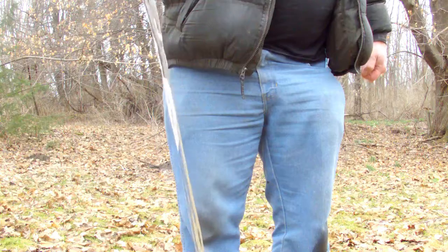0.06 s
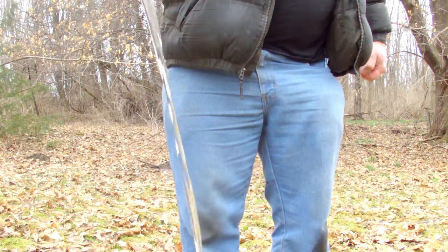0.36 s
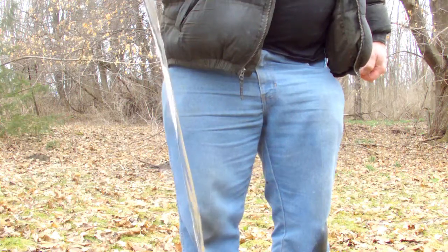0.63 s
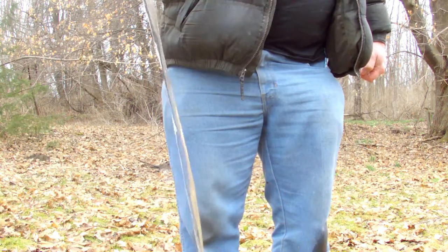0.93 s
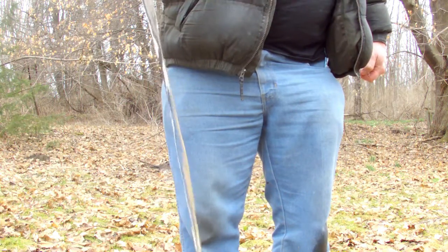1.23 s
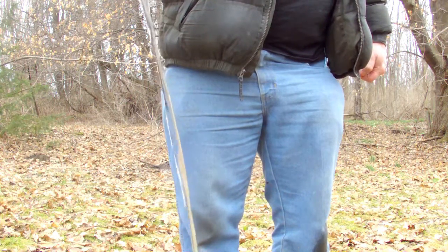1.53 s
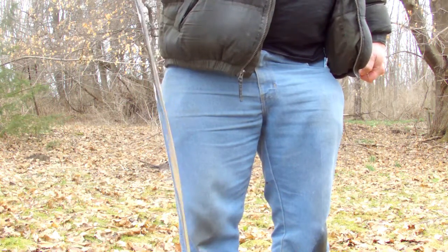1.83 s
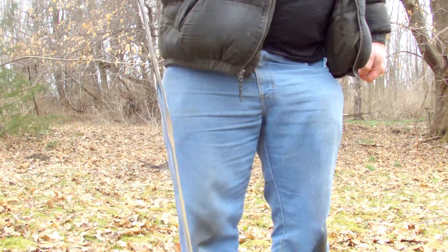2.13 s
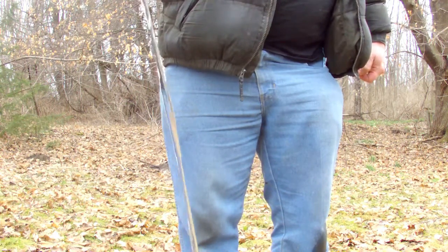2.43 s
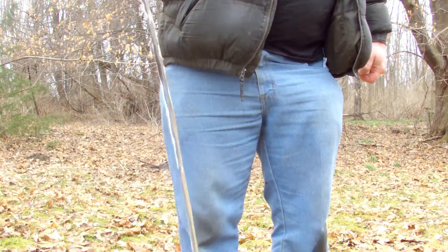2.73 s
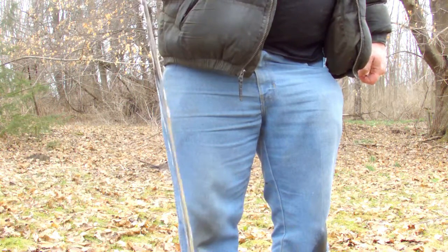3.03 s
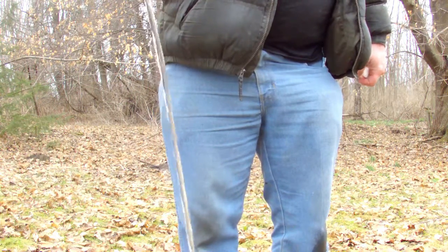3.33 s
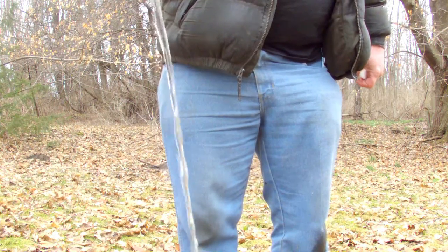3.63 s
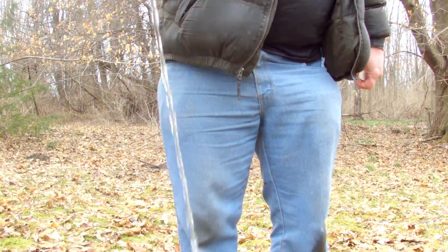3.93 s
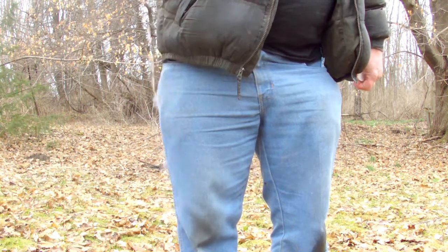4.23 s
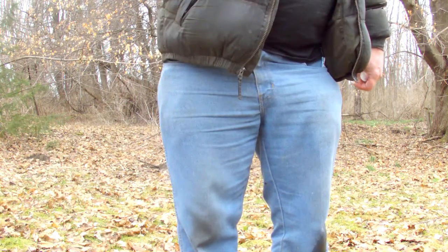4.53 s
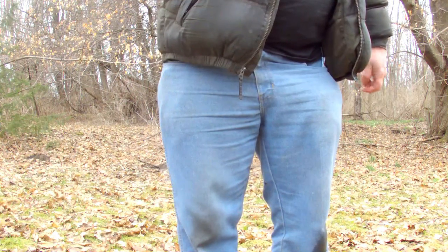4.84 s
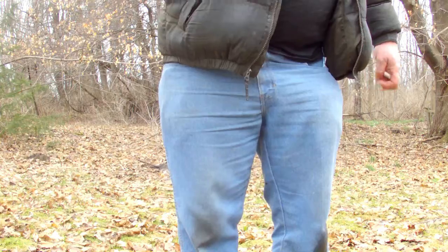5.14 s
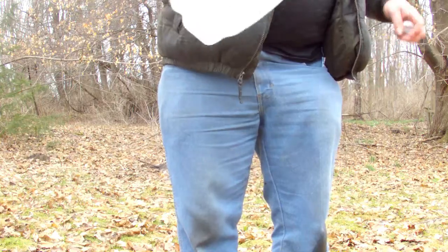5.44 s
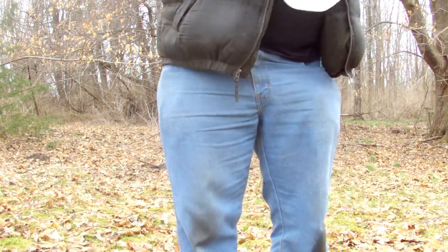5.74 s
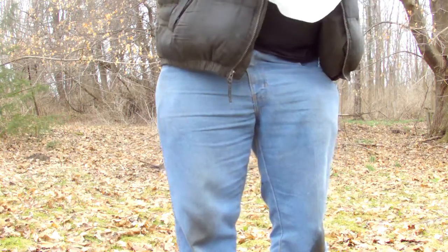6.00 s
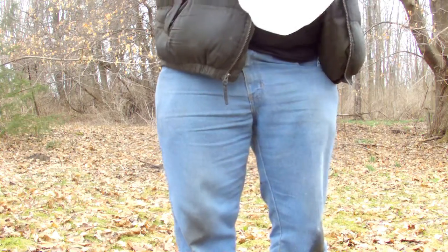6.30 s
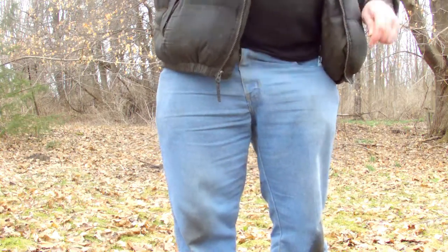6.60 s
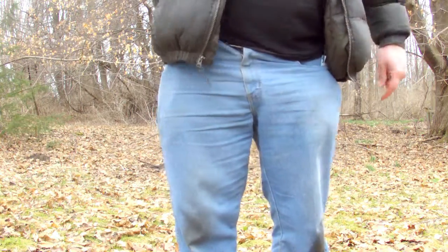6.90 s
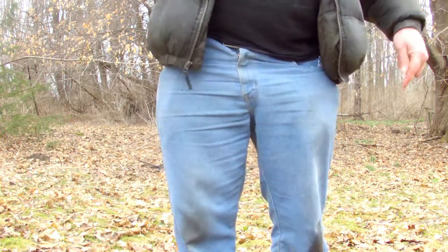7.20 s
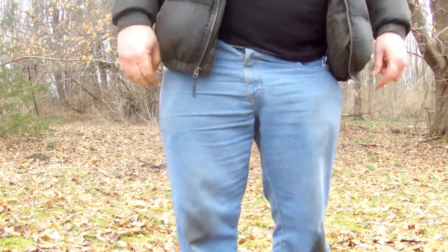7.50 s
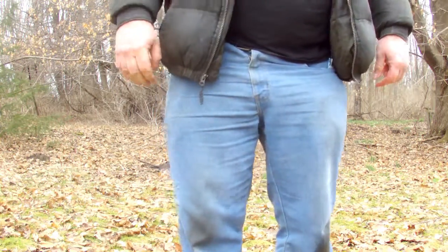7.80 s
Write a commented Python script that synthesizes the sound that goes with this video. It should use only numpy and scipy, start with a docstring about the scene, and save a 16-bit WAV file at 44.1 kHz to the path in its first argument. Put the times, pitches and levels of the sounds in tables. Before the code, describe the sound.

In a still wood, water pours steadily onto fallen leaves near the microphone, wet slaps mixed with crisp ticking spray. After it trickles out, hollow plastic pops and crackles come from the emptied jug, then a sharp knock and a softer landing on the leafy ground. Light jacket rustling runs under the handling and continues to the end, over a faint hiss of air.

```python
"""Water poured on dry leaves

A thin stream falls from a plastic jug in a quiet wood, beading into drops that slap the leaf bed
about 90 times a second, a few of them heavy; it dies away and soaks in. The empty jug pops as it
is handled, is knocked away and lands in the leaves; a jacket rustles."""
import sys
import numpy as np
from scipy import signal
from scipy.fft import rfft, irfft
from scipy.io import wavfile
from scipy.ndimage import uniform_filter1d

SR = 44100
rng = np.random.default_rng(int(sys.argv[2]) if len(sys.argv) > 2 else 0)


def output_pcm(signal):
    """Save a mono or channel-first signal as 16-bit PCM at the path in sys.argv[1].

    Samples are clipped to [-1, 1] before scaling.
    """
    pcm = np.clip(np.atleast_2d(signal).T, -1, 1) * 32767
    wavfile.write(sys.argv[1], SR, np.round(pcm).astype(np.int16))


N = 346626
HZ = np.fft.rfftfreq(N, 1 / SR)
TIME = np.arange(N) / SR


def amp(db):
    """Decibels to gain."""
    return 10 ** (np.asarray(db) / 20)


def unit(x):
    """Scales to rms 1."""
    return x / np.sqrt(np.mean(x ** 2) + 1e-20)


def read(points, hz):
    """Reads a curve on a log-frequency axis."""
    f, value = np.transpose(points)
    return np.interp(np.log(hz + 1), np.log(f + 1), value)


def add(mix, s, sound):
    """Mixes a sound in at time s."""
    part = mix[max(round(s * SR), 0):][:len(sound)]
    part += sound[:len(part)]


def colour(x, points, size=2048):
    """Causal EQ of unit energy: the curve sets tone, not loudness."""
    log_gain = np.log(amp(read(points, abs(np.fft.fftfreq(size, 1 / SR)))))
    taps = np.fft.ifft(np.exp(np.conj(signal.hilbert(log_gain)))).real[:size // 2]
    return signal.oaconvolve(x, taps / np.linalg.norm(taps))[:N]


def grains(per_s, spread_db):
    """Random clicks of unequal size, rms 1."""
    size = amp(spread_db * np.minimum(rng.exponential(1, N), 4))
    return unit(size * rng.choice([-1, 1], N) * (rng.random(N) < per_s / SR))


def clumps(depth_db, length_s=0.014):
    """A gain of rms 1 that swells and sinks rapidly at random."""
    blur = np.exp(-(HZ * length_s) ** 2)
    wander = unit(irfft(rfft(rng.standard_normal(N)) * blur, N))
    return unit(amp(depth_db * wander))


# Tone of the ambience: (frequency [Hz], gain [dB])
AIR_EQ = [(20, 4.5), (40, -8), (80, -9.5), (160, -17), (330, -16), (600, -10.5), (900, -6.5), (1200, -12.5),
          (2000, -20), (3500, -12.5), (6500, -35.5), (8500, -18.5), (12000, -20.5), (15800, -17)]
# Its stereo image: (frequency [Hz], left-right correlation [0..1])
AIR_CORRELATION = [(30, 0.34), (120, 0.065), (300, 0.98), (4000, 1), (9000, 0.88), (15000, 0.72)]
# Thin, steady whine: (frequency [Hz], level [dB])
WHINE_TONES = [(11864.5, -70), (15524, -82), (15584, -83), (15644, -81), (15704, -79)]
def air(db=-59.0):
    """Still woodland air with a camera's hiss, rumble and whine."""
    mid, side = rfft(rng.standard_normal((2, N))) * amp(read(AIR_EQ, HZ))
    same = np.clip(read(AIR_CORRELATION, HZ), -1, 1)
    hiss = irfft(mid * np.sqrt(1 + same) + np.array([[1], [-1]]) * side * np.sqrt(1 - same), N)
    whine = sum(amp(level) * np.sqrt(2) * np.sin(2 * np.pi * (hz * TIME + rng.random()))
                for hz, level in WHINE_TONES)
    return amp(db) * unit(hiss) + whine


def trunks(x, db=-27, t60=0.23, build_s=0.061):
    """The trunks scatter a faint, dull reverb tail."""
    t = np.arange(SR) / SR
    tail = rng.standard_normal(SR) * amp(-60 * t / t60) * np.minimum(t / build_s, 1)
    tail = signal.lfilter(*signal.butter(1, [400, 4000], "band", fs=SR), tail)
    return amp(db) * signal.fftconvolve(x, tail / np.linalg.norm(tail))[:N]


# Fader ride, soaking leaves into jacket: (time [s], rubbing [dB], swish [dB])
RUSTLE_RIDE = [(4.5, -58.5, -56), (5.02, -58.5, -58), (5.24, -60, -61.5), (5.51, -60, -61.5),
               (6.08, -55, -57), (6.29, -52.5, -55.5), (6.42, -56.5, -53), (6.49, -59.5, -61.5),
               (7.13, -55, -54), (7.3, -55, -52.5), (7.6, -55, -53), (7.86, -59.5, -53)]
# Sleeves brushing the jacket: (time [s], length [s], rubbing [dB], swish [dB])
SLEEVE_STROKES = [(7.664, 0.014, -59, -49), (7.684, .07, -66, -49.5)]
# Cloth on cloth, midrange rub and airy swish: (frequency [Hz], gain [dB])
RUBBING_EQ = [(200, -38), (500, -15), (1100, 1.5), (1600, 0.5), (2150, 2.5), (2900, -5), (3600, -5),
              (5000, -20), (12000, -23)]
SWISH_EQ = [(2000, -18), (4200, -4.5), (5200, -1.5), (6000, -0.5), (6550, 1.5), (7100, -4), (7800, -11.5),
            (11000, -20), (16000, -35)]
def rustle(rubbing_db=-2, swish_db=-3.0, floor_db=-66):
    """Fine, dense ticks fade in as the pour ends: leaves fizz as they soak, then the jacket rubs."""
    at, *levels = np.transpose(RUSTLE_RIDE)
    above_floor = np.sqrt(np.maximum(amp(levels) ** 2 - amp(floor_db) ** 2, 1e-9))
    rubbing, swish = (np.interp(TIME, at, gain) for gain in above_floor)
    for s, length, rub_db, brush_db in SLEEVE_STROKES:
        stroke = signal.windows.tukey(round(length * SR), .5)
        add(rubbing, s, amp(rub_db) * stroke)
        add(swish, s, amp(brush_db) * stroke)
    x = amp(rubbing_db) * rubbing * colour(grains(per_s=9000, spread_db=2.5), RUBBING_EQ)
    x += amp(swish_db) * swish * colour(grains(per_s=6400, spread_db=2.5), SWISH_EQ)
    return x * np.interp(TIME, [4.2, 4.5], [0, 1])


# The jug hitting the ground: (time [s], level [dB], decay [s])
THUD_CUES = [(6.698, -69, 0.028), (7.152, -53.5, 0.053)]
# Low end of soft soil: (frequency [Hz], gain [dB])
SOIL_EQ = [(60, -25), (120, -16), (175, -4), (250, 0), (400, -6), (1200, -40)]
def thuds(attack_s=.003):
    """The soil under the leaves takes the jug with a short, dull thump."""
    t, envelope = np.arange(SR // 2) / SR, np.zeros(N)
    for s, db, decay in THUD_CUES:
        add(envelope, s, amp(db) * np.exp(-t / decay) * (1 - np.exp(-t / attack_s)))
    return colour(envelope * rng.standard_normal(N), SOIL_EQ)


# Hits on the jug: (time [s], body [dB], body centre [Hz], crunch [dB], contact length [s])
JUG_HITS = [(5.073, -48.5, 280, -62, .003), (5.081, -52, 700, -64, .012), (5.153, -48, 1300, -66, .05),
            (5.811, -25.5, 1620, -30, 0.00079), (5.816, -32, 1540, -37, 0.0076),
            (5.849, -36, 1690, -54, 0.17), (5.9222, -23.5, 1770, -32, 0.0046),
            (5.9299, -25, 1750, -30, 0.0036), (5.9452, -28, 1800, -33, 0.0035),
            (6.1114, -34.5, 1350, -37.5, 0.0062), (6.137, -47, 1300, -43.5, 0.007),
            (6.177, -45.5, 636, -54, .004), (6.206, -47, 443, -58, 0.0062), (6.672, -31, 1330, -34, 0.022),
            (6.691, -22, 1390, -23.5, 0.0044), (6.695, -22, 1060, -24, 0.0041),
            (6.708, -27, 1090, -42, 0.0051), (6.745, -42.5, 596, -35, 0.005), (7.143, -44, 800, -30, 0.008),
            (7.152, -30, 790, -27.5, 0.01), (7.174, -39, 420, -44, 0.031),
            (7.439, -45, 1010, -43.5, 0.0082)]
# Ring of the hollow plastic: (frequency [Hz], gain [dB], full t60 [s])
JUG_MODES = [(357.6, -9.5, 0.24), (504, -9, 0.12), (746, -7.5, 0.086), (860, -9, 0.11), (995, -4.5, 0.11),
             (1135, -5, 0.17), (1218, -3.5, 0.15), (1390, -29, 0.035), (1683, 4, 0.088), (1945, 4, 0.042),
             (2430, -1, .07)]
# Wash of dense wall modes: (frequency [Hz], full t60 [s])
WALL_DECAY = [(200, 0.1), (400, 0.22), (800, 0.2), (1500, 0.14), (3000, 0.085), (8000, 0.065)]
# Crisp edge of plastic and leaves: (frequency [Hz], gain [dB])
CRUNCH_EQ = [(150, -24), (350, -20), (1200, -56), (2500, -3.5), (4000, 4.5), (6200, 6), (7600, 1),
             (9000, -9.5), (12000, -18.5), (16000, -27)]
def jug(modes_db=-2, wall_db=-4, octaves=0.8, scatter_db=-21, scatter_s=0.038, size=22050):
    """Each blow is a short crumple that rings the hollow jug and crunches plastic or leaves."""
    t, body, crunch = np.arange(size) / SR, np.zeros(N), np.zeros(N)
    mode_hz, mode_db, t60 = np.transpose(JUG_MODES)[:, :, None]
    onset = t < .006  # the transient sets a hit's level
    for s, body_db, centre_hz, crunch_db, contact in JUG_HITS:
        def reach(hz):
            """A blow stirs the modes near its centre, low ones if it is soft."""
            return 1 / (1 + (np.log2((hz + 1) / centre_hz) / octaves) ** 2) ** 0.96
        # Share of the full ring time: a grip chokes sharp pops and detunes the walls.
        ring = min(0.728 * (contact / 0.0082) ** 0.29, 1)
        phase, dent = rng.random((2, len(JUG_MODES), 1))
        bent_hz = mode_hz * (1 + 0.51 * max(.9 - ring, 0) * (dent - .5))
        envelopes = amp(mode_db - 60 * t / (t60 * ring)) * reach(mode_hz)
        modes = (envelopes * np.sin(2 * np.pi * (bent_hz * t + phase))).sum(0)
        hz, at, bands = signal.stft(rng.standard_normal(size), SR, nperseg=256)
        wall_t60 = contact * 2 + ring * read(WALL_DECAY, hz)[:, None]
        bands *= reach(hz)[:, None] * amp(-60 * at / wall_t60)
        wall = signal.istft(bands, SR, nperseg=256)[1][:size]
        shell = amp(modes_db) * modes / modes[onset].std() + amp(wall_db) * wall / wall[onset].std()
        attack = 1 - np.exp(-t / (0.26 * contact))
        add(body, s, amp(body_db) * shell * attack)
        crumple = rng.standard_normal(size) * unit(np.exp(.5 * rng.standard_normal(size)))
        release = np.exp(-t / (1.58 * contact)) + amp(scatter_db) * np.exp(-t / scatter_s)
        add(crunch, s, amp(crunch_db) * crumple * attack * release)
    # So small a shell radiates little bass.
    radiated = signal.sosfilt(signal.butter(3, [290, 6500], "band", fs=SR, output="sos"), body)
    return radiated + colour(crunch, CRUNCH_EQ)


FADE_START_S, LAST_WATER_S = 4.38, 4.56
# Fader ride of the stream: (time [s], wet body [dB], spray [dB])
FLOW_RIDE = [(0, -49.5, -52), (0.2, -47, -48.5), (0.6, -48, -48.5), (0.85, -46.3, -45.5), (1.2, -43, -47.6),
             (1.5, -47.5, -48), (1.85, -48, -47), (2.1, -51, -48), (2.5, -50.5, -48.5), (2.75, -51.5, -47),
             (3.0, -51, -46), (3.25, -49, -47.5), (3.5, -45.6, -44), (3.72, -48, -44.5),
             (4.05, -48.3, -45.5), (4.25, -54, -48.5), (4.38, -56, -54.5)]
def flow(s):
    """Gains of wet body and spray; both close as the last water lands."""
    at, body_db, spray_db = np.transpose(FLOW_RIDE)
    fade = np.interp(s, [FADE_START_S, LAST_WATER_S], [1, 0])
    return amp(np.interp(s, at, body_db)) * fade, amp(np.interp(s, at, spray_db)) * fade


# Bright accents of droplets and leaf flakes: (time [s], level [dB], decay [s])
SPATTER_CUES = [(.94, -53, .03), (2.96, -65, .02), (3.434, -43.5, 0.022), (3.94, -51, 0.018),
                (4.441, -53, .015), (7.146, -44.5, 0.03)]
# Top-end sparkle: (frequency [Hz], gain [dB])
MIST_EQ = [(3000, -23), (6000, 8.5), (8500, 10), (11500, 6), (13000, -22), (16000, -17)]
def mist(db=-17):
    """The finest droplets tick on dry leaves further out, in showers."""
    envelope = amp(db) * flow(TIME)[1] * clumps(depth_db=5.0, length_s=0.015)
    t = np.arange(SR // 4) / SR
    for s, burst_db, decay in SPATTER_CUES:
        add(envelope, s, amp(burst_db) * np.exp(-t / decay))
    return envelope * colour(grains(per_s=4100, spread_db=5.0), MIST_EQ)


# Pitched drumming: (time [s], length [s], pitch [Hz], level [dB])
PUDDLE_CUES = [(3.196, 0.38, 2950, -63), (4.2, 0.285, 1100, -57.5)]
def puddles(width_hz=130):
    """Drops drum in a small puddle or a cupped leaf, which rings at its own pitch."""
    x = np.zeros(N)
    for s, length, hz, db in PUDDLE_CUES:
        window = signal.windows.tukey(round(length * SR), .5)
        ticks = grains(per_s=240, spread_db=6)[:len(window)]
        ring = signal.lfilter(*signal.iirpeak(hz, hz / width_hz, fs=SR), ticks)
        add(x, s, amp(db) * window * unit(ring))
    return x


def bubbles(db=-8.5, per_s=170, cycles=7, spread_db=2, size=1800):
    """Air caught under the water pings for a few milliseconds, rising in pitch."""
    t, pings = np.arange(size) / SR, np.zeros(N)
    for when, small, chance in rng.random((2000, 3))[:round(per_s * LAST_WATER_S)]:
        turns = 1000 * 4.13 ** small * t * (1 + 3 * t)
        ping = np.sin(2 * np.pi * turns) * np.exp(-turns / cycles) * (1 - np.exp(-turns))
        gain = amp(-spread_db * np.log(chance + .02))
        add(pings, when * LAST_WATER_S, gain * ping / np.linalg.norm(ping))
    return amp(db) * flow(TIME)[0] * pings / pings[TIME < LAST_WATER_S].std()


# Wet slap of a drop: (frequency [Hz], gain [dB])
SLAP_EQ = [(100, -28), (250, -17.5), (420, -6), (560, -0.5), (2700, 4), (4000, -3), (7000, -17),
           (10000, -20)]
# Dry crackle of leaves under drops and spray: (frequency [Hz], gain [dB])
LEAF_EQ = [(500, -24.5), (1600, -7.5), (2600, -2.5), (3200, -5.5), (3900, 1), (6200, 0.5), (7000, -2.5),
           (8500, -10), (10500, -16.5), (12500, -17), (16000, -40)]
def drops(rows, slap_db, crackle_db, cycles=0.76, crackle_s=0.00062, leaf_width_hz=1100, size=400):
    """Each drop gives a heavily damped slap; the leaf under it crackles at a pitch of its own."""
    t, slaps, crackles = np.arange(size) / SR, np.zeros(N), np.zeros(N)
    span = np.sqrt(.003 * SR)  # a drop's level is its rms over 3 ms
    noises, variations = rng.standard_normal((len(rows), 2, size)), rng.random((len(rows), 4))
    for (s, wet_db, dry_db, hz), noise, (bend, length, leaf, lag) in zip(rows, noises, variations):
        turns = hz * t * np.exp(0.64 * (bend - .5))
        pulse = np.gradient(np.sin(np.pi * turns) ** 2 * np.exp(-turns / cycles * (1 + turns / 5)))
        splat = uniform_filter1d(noise[1], size=12) * t * np.exp(-t / 0.001)
        slap = unit(pulse) + 0.5 * unit(splat)
        add(slaps, s, amp(wet_db + slap_db) * span * slap / np.linalg.norm(slap))
        spread = t / (crackle_s * np.exp(length - .5))  # the drop flattens in about a millisecond
        burst = noise[0] * spread * np.exp(-spread)
        leaf_hz = 2300 + leaf * 4600
        ring = signal.lfilter(*signal.iirpeak(leaf_hz, leaf_hz / leaf_width_hz, fs=SR), burst)
        crackle = unit(burst) + 0.94 * unit(ring)
        crackle *= amp(dry_db + crackle_db) * span / np.linalg.norm(crackle)
        add(crackles, s + .0008 * (lag - .7), crackle)
    return colour(slaps, SLAP_EQ) + colour(crackles, LEAF_EQ)


# Wet body of the stream: (frequency [Hz], gain [dB])
SPLASH_EQ = [(100, -44), (220, -22), (400, -7), (700, -3), (1100, 3.5), (1900, 6), (2600, 2), (4000, -21),
             (9000, -19)]
def splash(body_db=-8, spray_db=-4.5):
    """The drops throw up clumps of wet splash and of spray that ticks on the leaves."""
    body, spray = flow(TIME)
    wet = clumps(depth_db=3.5) * colour(grains(per_s=1500, spread_db=1.0), SPLASH_EQ)
    crisp = clumps(depth_db=3.0) * colour(grains(per_s=4000, spread_db=2.5), LEAF_EQ)
    return amp(body_db) * body * wet + amp(spray_db) * spray * crisp


# Resonances of the wet leaf bed: (frequency [Hz], width [Hz], gain [dB])
BED_MODES = [(1018, 15, -7), (1230, 45, -16), (1820, 27, -44), (1916, 20, -19.5), (2400, 51, -13),
             (6200, 36, -17), (6020, 730, -7)]
# Early reflections: (delay [s], gain [dB])
REFLECTIONS = [(.0021, -26), (.0046, -23), (.0061, -19.5), (.0089, -15.5), (0.0119, -15)]
def leaf_bed(x, db=0.5):
    """The water rings in the leaf bed and reflects off the ground and the person pouring."""
    bed = 1 + sum(amp(gain) / (1 + 2j * (HZ - hz) / width) for hz, width, gain in BED_MODES)
    echoes = 1 + sum(amp(gain) * np.exp(-2j * np.pi * HZ * delay) for delay, gain in REFLECTIONS)
    return amp(db) * irfft(rfft(x) * bed * echoes, N)


def patter(heavy_s, gap_s=.0108, jitter=.24, slap_spread_db=5.0, crackle_spread_db=3, bead_hz=1626):
    """Cues for the stream beading almost evenly between heavy drops; random sizes ride the flow."""
    edges = np.concatenate([[0], np.sort(heavy_s)])
    s = np.concatenate([np.linspace(a, b, max(round((b - a) / gap_s), 1) + 1)[1:-1]
                        for a, b in zip(edges, edges[1:])])
    late, size, leaf, detune = rng.uniform(-np.sqrt(3), np.sqrt(3), (len(s), 4)).T
    body_db, spray_db = 20 * np.log10(np.array(flow(s)) + 1e-9)
    slap_db = body_db - .8 + slap_spread_db * size
    crackle_db = spray_db - 1.47 + crackle_spread_db * (leaf + 0.24 * size)
    octaves = np.clip((-37 - slap_db) / 44, -1, .25)  # heavier drops sound lower, 44 dB to the octave
    hz = bead_hz * 2 ** octaves * np.exp(0.46 * detune)
    return np.transpose([s + jitter * gap_s * late, slap_db, crackle_db, hz])


# Heavy drops and last stragglers: (time [s], slap [dB], leaf crackle [dB], nominal pitch [Hz])
HEAVY_DROPS = [(.399, -47, -35, 2110), (0.4098, -39, -40, 2420), (0.8127, -36, -41, 1893),
               (.85, -35, -49, 1770), (0.8972, -39, -43, 1520), (1.091, -34.5, -45, 1134),
               (1.124, -36, -53, 1843), (1.1521, -37, -53, 1540), (1.2977, -37.5, -49, 1224),
               (1.3306, -31.5, -44, 1280), (1.4609, -36.5, -56, 937), (1.477, -34.5, -52, 1800),
               (1.5317, -36.5, -52, 1180), (1.606, -38.5, -50, 1330), (1.6535, -37, -46, 1148),
               (1.7881, -35.5, -38, 1800), (2.3654, -45, -41, 1520), (2.4604, -37.5, -46, 1279),
               (2.5604, -35, -52, 960), (2.6122, -35, -45, 1025), (2.754, -36, -56, 920),
               (2.817, -38.5, -41, 1332), (2.87, -41, -33.5, 1460), (2.9516, -33, -42.5, 1400),
               (2.9629, -35.5, -44, 2493), (3.007, -31, -47, 1130), (3.0448, -31.5, -56, 1120),
               (3.0988, -48, -38, 2210), (3.1141, -35, -37, 1500), (3.1868, -45, -34.5, 1354),
               (3.376, -34, -39.5, 1656), (3.4205, -32.5, -51, 1091), (3.4754, -35, -37, 2200),
               (3.5785, -33.5, -40, 1730), (3.601, -39, -36, 1886), (3.8436, -26, -33, 990),
               (3.9106, -30, -37, 1360), (4.0581, -41, -43, 1199), (4.085, -37.5, -40, 1965),
               (4.1542, -57, -36.5, 2330), (4.4414, -41, -37.5, 2090), (4.448, -50, -39.5, 1620),
               (4.4865, -50, -40, 2200), (4.5353, -57, -43, 2000)]
def water():
    """The pour: heavy drops accent a fast patter, layered with splash, mist, puddles and bubbles."""
    accents = drops(HEAVY_DROPS, slap_db=-8.5, crackle_db=-4)
    beads = drops(patter(np.transpose(HEAVY_DROPS)[0]), slap_db=-7.5, crackle_db=-3.0)
    return leaf_bed(accents + beads + splash() + mist() + puddles() + bubbles())


def scene():
    """Water, jug and jacket sit dead centre, over a faint reverb and the stereo air."""
    near = water() + jug() + thuds() + rustle()
    return near + trunks(near) + air()


def record(dry, notch_hz=7900, notch_width_hz=260, cutoff_hz=15850):
    """The microphone housing cuts a narrow notch; a steep low-pass trims the top."""
    housing = 1 - 0.64 / (1 + 2j * (HZ - notch_hz) / notch_width_hz)
    notched = irfft(rfft(dry) * housing, N)
    low_pass = signal.firwin(511, cutoff_hz, window=("kaiser", 9), fs=SR)
    return signal.oaconvolve(notched, low_pass[None], "same")


dry = scene()
out = record(dry)
output_pcm(out)
```